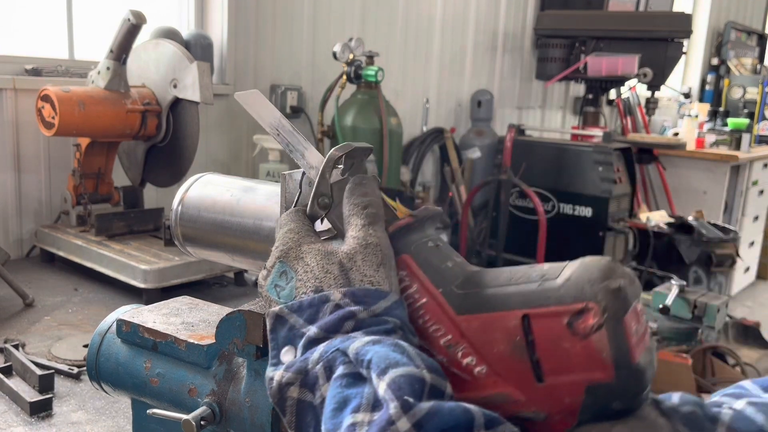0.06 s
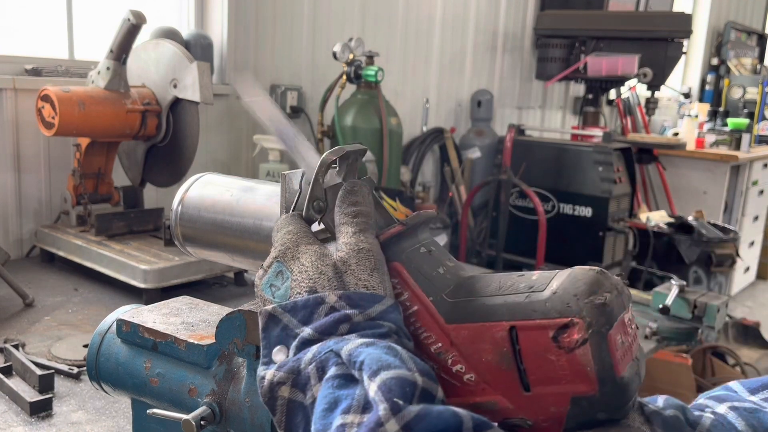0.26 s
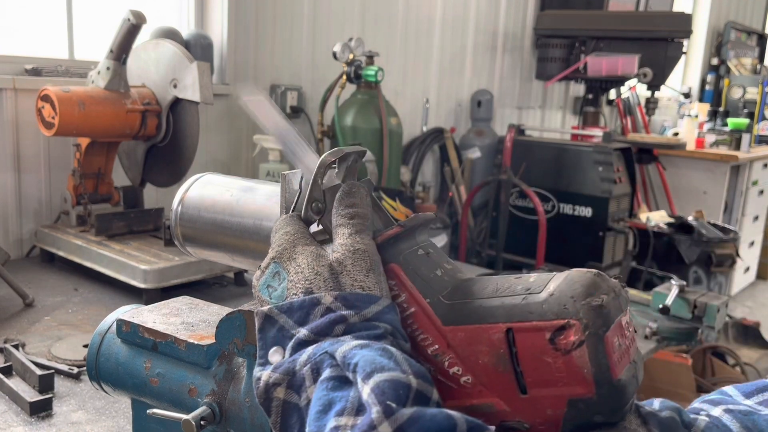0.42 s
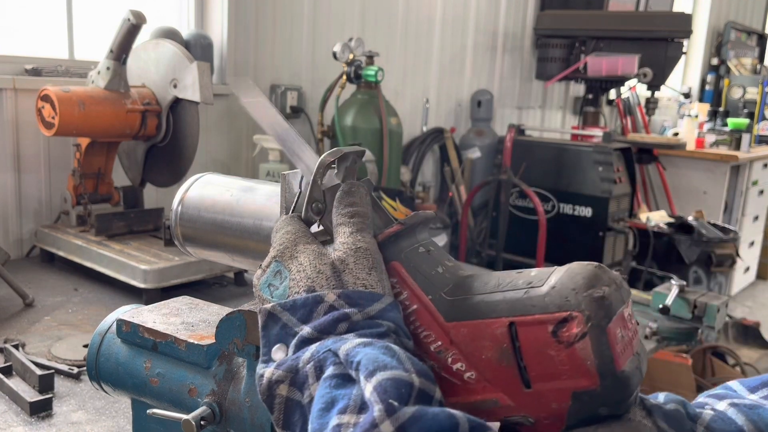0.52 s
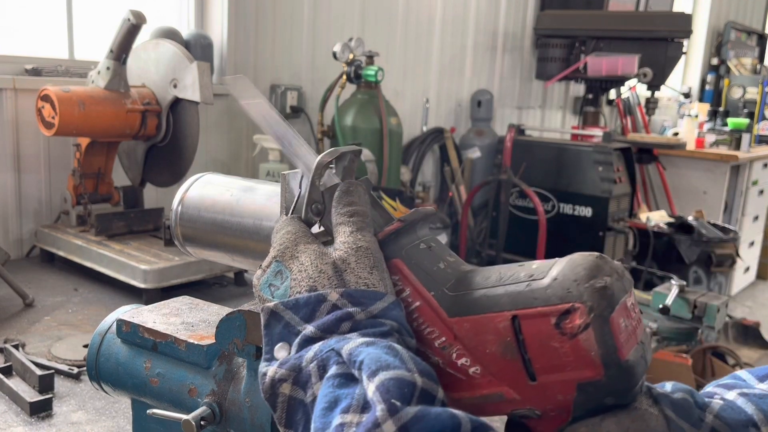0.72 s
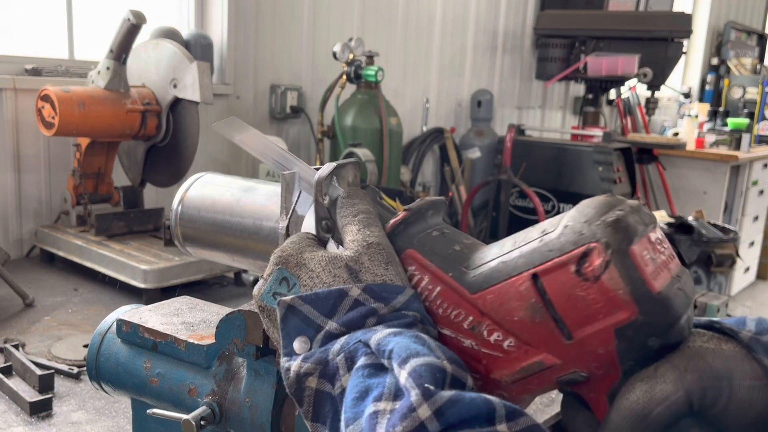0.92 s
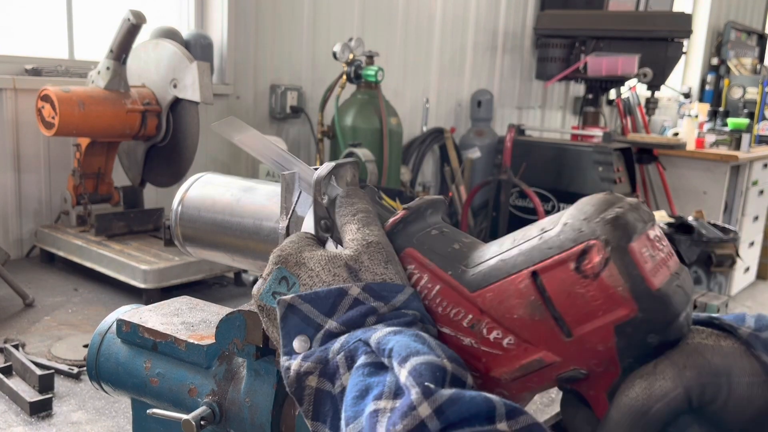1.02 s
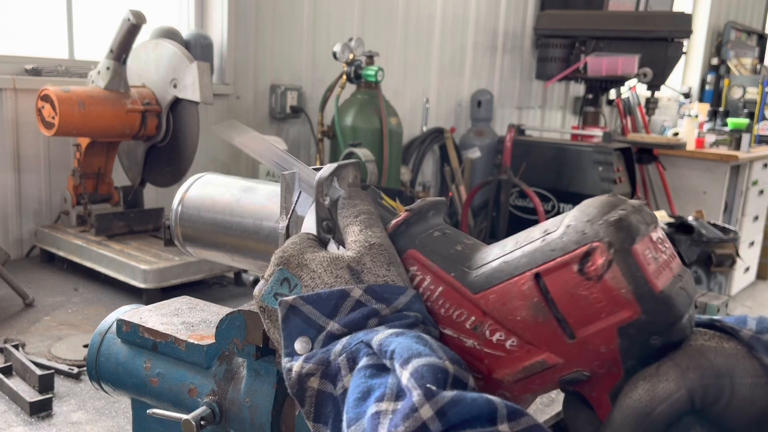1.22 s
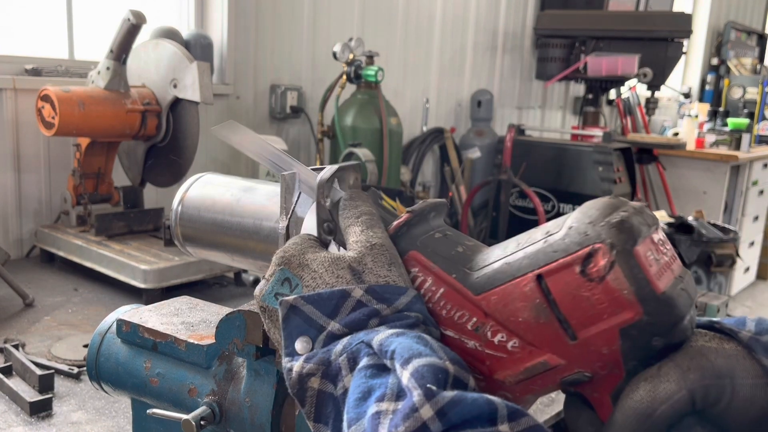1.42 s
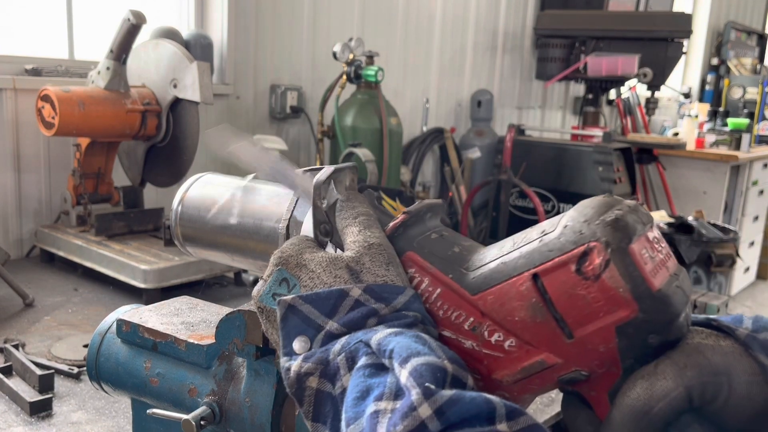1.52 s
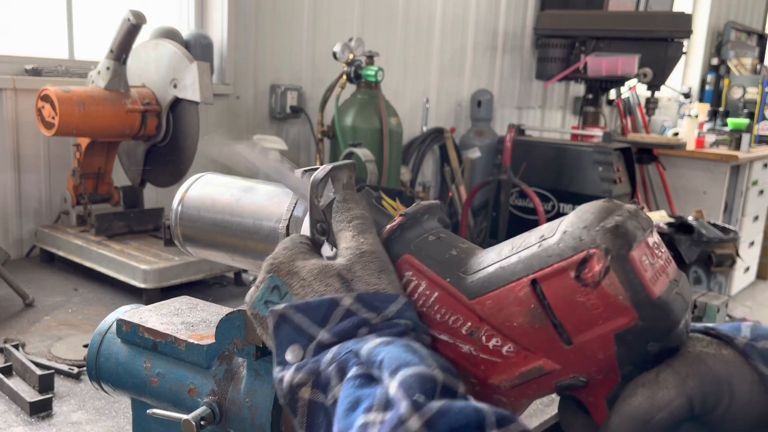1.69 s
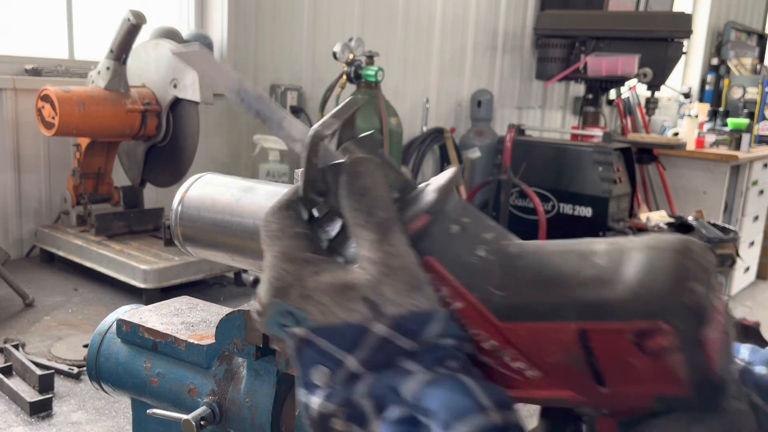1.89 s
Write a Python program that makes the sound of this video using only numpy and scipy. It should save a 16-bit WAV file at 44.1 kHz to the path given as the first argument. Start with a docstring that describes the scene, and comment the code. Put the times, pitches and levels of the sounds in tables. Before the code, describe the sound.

A reciprocating saw cuts metal close by in a small workshop. After near quiet, the trigger clicks at 0.13 seconds; slow knocking strokes accelerate into a rapid rasping buzz, with hard clacks and a piercing screech around 0.5-0.6. The level dips briefly at 0.95, then a lighter, steadier full-speed cut follows with sliding metallic resonances, fading from about 1.7 to 1.9, leaving a faint thin tone.

```python
"""A cordless reciprocating saw cuts a metal plate held in a vise, close by in a small workshop.
The trigger clicks and the saw runs up to about 47 strokes a second; the level dips briefly,
and a second, lighter cut is heard at full speed and fades away.
On each stroke, clusters of tiny impacts make the teeth rasp, the drive knock and the blade tick.
The rasp rings the plate, which also screeches; hard clacks sound where the blade snags.
Sliding resonances color the second cut, and a thin tone grows throughout, over faint background noise."""
import sys
import numpy as np
from scipy import signal
from scipy.fft import rfft, irfft
from scipy.io import wavfile
from scipy.ndimage import uniform_filter1d

SR = 44100
rng = np.random.default_rng(int(sys.argv[2]) if len(sys.argv) > 2 else 0)


def wav_record(signal):
    """Record a signal, one row per channel, as 16-bit PCM in the file named by sys.argv[1]."""
    frames = np.transpose(np.atleast_2d(signal))
    bounded = np.clip(frames, -1, 1)
    # unit amplitude maps onto the largest positive 16-bit level
    quanta = np.round(bounded * 32767).astype(np.int16)
    wavfile.write(sys.argv[1], SR, quanta)


N = 85995
T = np.arange(N) / SR  # time of every sample, seconds


def amp(db):
    """Turns decibels into a gain."""
    return 10 ** (np.asarray(db) / 20)


def evened(x):
    """Scales a signal to an rms (average strength) of 1."""
    return x / np.sqrt(np.mean(x ** 2) + 1e-20)


def curve(rows, axis=1):
    """Draws straight lines through one column of a time table, giving a value for every sample."""
    rows = np.array(rows)
    return np.interp(T, rows[:, 0], rows[:, axis])


def read(points, hz):
    """Reads a frequency table, with pitch spaced as the ear hears it (logarithmically)."""
    f, value = np.transpose(points)
    return np.interp(np.log(hz + 1), np.log(f + 1), value)


def pan(db):
    """Left and right gains that differ by db, with a mean power of 1."""
    return evened(amp([[db / 2], [-db / 2]]))


def colour(x, points, size=4096):
    """Gives a sound the spectrum in a table, using a filter of unit energy that never sounds early."""
    log_gain = np.log(amp(read(points, abs(np.fft.fftfreq(size, 1 / SR)))))
    minimum_phase = np.exp(np.conj(signal.hilbert(log_gain)))
    taps = np.fft.ifft(minimum_phase).real[:size // 2]
    return signal.fftconvolve(x, taps / np.linalg.norm(taps))[:N]


def ring(x, hz, width_hz):
    """A resonance of unit energy at a fixed or moving pitch; the narrower it is, the longer it rings."""
    turn = np.exp(2j * np.pi * np.cumsum(hz * np.ones(N)) / SR)
    r = np.exp(-np.pi * width_hz / SR)
    # Shift the pitch down to zero, smooth, then shift it back up.
    smoothed = signal.lfilter([np.sqrt(2 * (1 - r * r))], [1, -r], x / turn + 1e-18)
    return (turn * smoothed).real


# Spectrum of the background noise: (frequency [Hz], level [dB])
AIR = [(30, -1), (15000, -34)]
AIR_DB = -64


def background():
    """Faint noise, strongest in the bass and independent in the two channels."""
    return amp(AIR_DB) * np.array([colour(noise, AIR) for noise in rng.standard_normal((2, N))])


# Spectrum of the scraping teeth, also used for the trigger snap: (frequency [Hz], level [dB])
RASP = [(200, -19), (700, -2), (2600, 0), (3350, -6.5), (4100, 1.5), (5100, 0), (5500, -6), (7300, -6.5),
        (15000, -24.5)]
TRIGGER_S, SNAP_DB, SNAP_S = .131, -39, 0.0031  # start [s], level [dB], fading time [s]
TRIGGER_HZ, TRIGGER_DB, TRIGGER_T60 = 415, -39, 0.14  # housing tone; T60 is seconds to fade by 60 dB


def trigger():
    """The switch snaps as a burst of noise, and the housing rings briefly as a fading tone."""
    t = np.maximum(T - TRIGGER_S, 0)
    snap = amp(SNAP_DB) * (t > 0) * np.exp(-t / SNAP_S) * rng.standard_normal(N)
    housing = amp(TRIGGER_DB - 60 * t / TRIGGER_T60) * np.sin(2 * np.pi * TRIGGER_HZ * t)
    return colour(snap, RASP) + housing


def strokes(speed, bite_s):
    """Counts strokes from the moment the teeth catch by adding up the stroke rate."""
    turns = np.cumsum(curve(speed)) / SR
    return turns - np.interp(bite_s, T, turns)


TEETH_PER_S = 12000  # average number of tiny impacts per second
TOOTH_SPREAD_DB, BLOW_SPREAD_DB = 2.5, 1.34  # random variation in impacts and in whole blows


def blows(turns, rows, decay_s, floor, axis, rebound=1):
    """Clusters of tiny impacts start at set places in each stroke and die away, over steady rubbing."""
    kicks = np.zeros(N)
    for k, row in enumerate(rows):
        at = np.flatnonzero(np.diff(np.floor(turns - row[0])) > 0)
        # Rebound changes every blow except the first, the bite.
        strength = np.ones(N) * (rebound if k else 1)
        spread_db = BLOW_SPREAD_DB * rng.standard_normal(size=128)[:len(at)]
        kicks[at] += strength[at] * amp(row[axis] + spread_db)
    fading = signal.lfilter([1], [1, -np.exp(-1 / (decay_s * SR))], kicks)
    pressure = floor * rebound + fading
    sizes = amp(TOOTH_SPREAD_DB * np.minimum(rng.exponential(1, N), 4))
    sizes *= rng.choice([-1, 1], N)
    hits = rng.random(N) < TEETH_PER_S / SR
    return evened(pressure * sizes * hits)


# Spectrum of the saw's housing: (frequency [Hz], level [dB])
HOUSING = [(50, -64), (180, -19.5), (340, -7), (480, 1.5), (570, -5), (700, -18), (1100, -10.5),
           (8000, -55)]
KNOCK_S, KNOCK_FLOOR = 0.0026, 0.37  # fading time [s], rubbing between blows


def knocking(knock, turns, pattern, pace):
    """The drive strikes inside its housing, with stronger rebounds at higher speed."""
    hits = blows(turns, pattern, KNOCK_S, KNOCK_FLOOR, axis=1, rebound=pace)
    return colour(knock * hits, HOUSING)


# Spectrum of the blade's tick: (frequency [Hz], level [dB])
TICK = [(500, -37), (4000, -12), (7500, 1), (9500, -0.5), (10900, 3), (12000, -4.5)]
TICK_S, TICK_FLOOR = 0.0044, 0.25  # fading time [s], rubbing between blows


def ticking(tick, turns, pattern):
    """The blade makes short, bright ticks as it turns round."""
    return colour(tick * blows(turns, pattern, TICK_S, TICK_FLOOR, axis=3), TICK)


# Tones of the shaking saw body, before the knock force and speed scale them:
# (multiple of the stroke rate [-], first-cut level [dB], second-cut level [dB])
HUM = [(2, -24.5, -22), (3, -27.5, -14), (4, -14, -31), (6, -14.5, -17.5), (7, -12.5, -9.5),
       (12, -20, -10.5)]
# Spectrum of its low rumble: (frequency [Hz], level [dB])
RUMBLE = [(25, -13), (220, 1), (500, -25.5)]
RUMBLE_DB, SHAKE_POWER = -14.5, 3.23  # level before force and speed; how steeply shaking grows with speed


def shaking(knock, turns, pace, axis):
    """The saw body hums at multiples of the stroke rate and rumbles, more strongly at higher speed."""
    hum = np.zeros(N)
    for row in HUM:
        phase = 2 * np.pi * (round(row[0]) * turns + rng.random())
        hum += np.sqrt(2) * amp(row[axis]) * np.sin(phase)
    rumble = amp(RUMBLE_DB) * colour(rng.standard_normal(N), RUMBLE)
    return knock * pace ** SHAKE_POWER * (hum + rumble)


# Natural tones of plate and blade:
# (frequency [Hz], time to fade by 60 dB [s], first-cut level [dB], second-cut level [dB])
PLATE = [(1001.5, 0.64, -20, -14.5), (1083, 0.077, -10.5, -12), (2474, 0.075, -11, -49),
         (2675, 0.025, -15.5, -22), (2835, 0.02, -13, -31), (3886, 0.029, -11, -32),
         (4810, 0.041, -11.5, -41), (5020, 0.047, -23, -17), (7202, 0.033, -16, -5.5)]


def ringing(drive, axis):
    """Impacts set off the natural tones of plate and blade, with the strengths of one cut."""
    tones = np.zeros(N)
    for row in PLATE:
        width_hz = np.log(1000) / np.pi / row[1]
        tones += amp(row[axis + 1]) * ring(drive, row[0], width_hz)
    return tones


RASP_S = 0.0093  # fading time of each rasp [s]
FULL_RATE = 43.9  # strokes per second at which pace is 1


def cut(speed, bite_s, force, pattern, rubbing, axis):
    """One cut adds rasping teeth, knocking, ticking, shaking and the ringing plate."""
    turns, pace = strokes(speed, bite_s), curve(speed) / FULL_RATE
    knock, rasp, tick = (amp(curve(force, axis=k)) for k in (1, 2, 3))
    teeth = rasp * blows(turns, pattern, RASP_S, rubbing, axis=2, rebound=pace)
    saw = colour(teeth, RASP)
    saw += knocking(knock, turns, pattern, pace)
    saw += ticking(tick, turns, pattern)
    saw += shaking(knock, turns, pace, axis)
    return saw + ringing(teeth, axis)


# Stroke rate of the first cut: (time [s], rate [strokes/s])
SPEED_A = [(.179, 24.8), (.28, 24.8), (.4, 31.3), (.5, 41.1), (.6, 43.3), (.7, 45.4), (.8, 46.5), (.92, 47)]
# Its changing force: (time [s], knock level [dB], rasp level [dB], tick level [dB])
FORCE_A = [(.135, -46, -46.5, -59), (0.216, -32, -25.5, -34), (.33, -25, -26.5, -31),
           (.42, -22.5, -25.5, -26), (.48, -27, -24, -27), (.75, -24.5, -22.5, -26.5),
           (0.917, -26.5, -22, -27), (.945, -53, -70, -48)]
# Its blows in each stroke, before evening out:
# (share of the cycle [-], knock level [dB], rasp level [dB], tick level [dB])
BLOWS_A = [(.0, -4, -8.5, -26), (0.271, -5.5, -3.5, 3), (0.758, -9.5, -8, -5)]
BITE_A_S, RUB_A = .179, .05  # a moment when the teeth catch [s]; rubbing between rasps


def first_cut():
    """The saw speeds up as its teeth repeatedly strike the plate."""
    return cut(SPEED_A, BITE_A_S, FORCE_A, BLOWS_A, RUB_A, axis=1)


# Screech strength before flaring and panning: (time [s], level [dB])
SCREECH = [(.14, -54), (.23, -33.5), (.45, -28), (.495, -17), (.57, -12.5), (.605, -25), (.635, -23),
           (.68, -27), (.91, -26), (.945, -62), (1.42, -30), (1.72, -36.5), (1.95, -70)]
SCREECH_HZ, SCREECH_WIDTH_HZ, SCREECH_PAN_DB = 4298, 7, 10.5  # pitch, blur, left above right
SCREECH_FADE_CYCLES, SCREECH_HOLD = 0.8, .2  # fading within a stroke; steady part added to each flare


def screech(turns):
    """The plate chatters at one slightly unsteady pitch, flaring up as each stroke bites."""
    drift = np.cumsum(rng.standard_normal(N)) * np.sqrt(2 * np.pi * SCREECH_WIDTH_HZ / SR)
    flare = np.exp(-(turns % 1) / SCREECH_FADE_CYCLES)
    pump = SCREECH_HOLD + uniform_filter1d(flare, size=90)  # soften each sudden rise
    tone = np.sqrt(2) * np.sin(2 * np.pi * SCREECH_HZ * T + drift)
    return pan(SCREECH_PAN_DB) * amp(curve(SCREECH)) * pump * tone


# Snags of the blade, before filtering: (time [s], chatter level [dB], thump level [dB])
CLACKS = [(.178, -27, -19), (0.218, -14.5, -6.5), (0.256, -16.5, -0.5), (.299, -16, 3.5),
          (.336, -15.5, 3.5), (.373, -26, 4.5), (0.434, -11.5, -9), (0.464, -7, -0.5), (.488, -3.5, -12),
          (0.542, -4, 1), (.627, -7, -2), (.912, -10.5, -8)]
CLACK_S, CLACK_LOW_HZ, RECOIL_S = 0.0044, 2080, 0.003993  # fading time, lower edge, delay of the thump


def clacks():
    """The blade snags: hard chatter rings the plate's upper tones, and recoil thumps the housing."""
    chatter, thumps = np.zeros(N), np.zeros(N)
    for s, chatter_db, thump_db in CLACKS:
        chatter += (T >= s) * amp(chatter_db) * np.exp(-abs(T - s) / CLACK_S)
        thumps[round((s + RECOIL_S) * SR)] = amp(thump_db)
    highpass = signal.butter(2, CLACK_LOW_HZ, "high", fs=SR, output="sos")
    hard = signal.sosfilt(highpass, chatter * rng.choice([-1, 1], N))
    return ringing(hard, axis=1) + colour(thumps, HOUSING)


def lingering(hz=2645, db=-48):
    """A tone of the metal grows steadily from the first bite to the end, as the saw fades away."""
    growth = np.maximum(T - BITE_A_S, 0) / T[-1]
    return amp(db) * growth * np.sin(2 * np.pi * hz * T)


# Stroke rate of the second cut: (time [s], rate [strokes/s])
SPEED_B = [(1.4, 46.7), (1.5, 46.9), (1.6, 47.6), (1.68, 49), (1.8, 47.3)]
# Its changing force: (time [s], knock level [dB], rasp level [dB], tick level [dB])
FORCE_B = [(0.947, -40, -31.5, -34), (.985, -34.5, -25.5, -31), (1.55, -32, -24, -31),
           (1.75, -32, -28.5, -33), (1.815, -41, -37.5, -40.5), (1.85, -53, -53.5, -89.5),
           (1.95, -65, -54, -83)]
# Its blows in each stroke, before evening out:
# (share of the cycle [-], knock level [dB], rasp level [dB], tick level [dB])
BLOWS_B = [(.0, -12, 8, -5.5), (.39, 6, -4, -6), (0.723, -1, -25, -15)]
BITE_B_S, RUB_B = 0.99, .45  # a moment when the teeth catch [s]; rubbing between rasps


def second_cut():
    """A separate, lighter cut is heard at full speed, with more rubbing between rasps, and fades away."""
    return cut(SPEED_B, BITE_B_S, FORCE_B, BLOWS_B, RUB_B, axis=2)


# A blade resonance that rises a little, then sinks: (time [s], frequency [Hz], drive level [dB])
SINKING = [(.98, 2180, -31), (1.09, 2260, -29.5), (1.34, 1870, -36)]
# A narrow ring of the plate that sinks, then rises a little: (time [s], frequency [Hz], drive level [dB])
SQUEAL = [(1.22, 3985, -39.5), (1.46, 3865, -28), (1.54, 3906, -33.5)]
SINKING_WIDTH_HZ, SQUEAL_WIDTH_HZ = 100, 20


def sliding_resonance(track, width_hz):
    """The teeth of the second cut set off a resonance whose pitch slides as the cut deepens."""
    teeth = blows(strokes(SPEED_B, BITE_B_S), BLOWS_B, RASP_S, RUB_B, axis=2)
    sounding = (T > track[0][0]) & (T < track[-1][0])
    return ring(teeth * sounding * amp(curve(track, axis=2)), curve(track), width_hz)


# Level difference between the microphones: (frequency [Hz], left minus right level [dB])
TILT = [(700, 0.5), (1200, 2.5), (2400, -2), (4400, 6.5), (7500, 0)]
# Phase difference between the microphones: (frequency [Hz], left lead [radians])
LEAD = [(200, 0), (1100, .6), (1550, -.8), (2900, 1.1), (6800, -1.4), (11000, -6), (13200, -6.6),
        (15000, -9)]


def ports(saw, plate):
    """The direct sound reaches two microphones with different levels and phases at each pitch."""
    hz = np.fft.rfftfreq(2 * N, 1 / SR)
    side = np.array([[.5], [-.5]])
    gains = amp(side * read(TILT, hz))
    gains = gains / np.sqrt((gains ** 2).mean(0))
    # The screech is already panned, so only its phases change here.
    z = rfft(saw, 2 * N) * gains + rfft(plate, 2 * N)
    return irfft(z * np.exp(1j * side * read(LEAD, hz)))[:, :N]


# How long the room's echoes last: (frequency [Hz], time to fade by 60 dB [s])
ROOM = [(300, 0.36), (3000, 0.5), (14000, 0.023)]
ROOM_DB, NEAR_DB = -12.5, -10  # echo levels before the bass is removed
NEAR_S, SCATTER_HZ = .006, 440  # fading time of the nearby scatter; lower edge of all echoes


def workshop(x, size=256):
    """Quick scatter from nearby metal widens all but the bass; then comes the room's short tail."""
    t = T[:SR // 2]
    near, far = rng.standard_normal(len(t)), rng.standard_normal((2, len(t)))
    near = np.array([[1], [-1]]) * near * np.exp(-t / NEAR_S)  # opposite signs left and right
    hz, at, z = signal.stft(far * (t > 2 * NEAR_S), SR, nperseg=size)
    fading = amp(-60 * at / read(ROOM, hz)[:, None])
    far = signal.istft(z * fading, SR, nperseg=size)[1][:, :len(t)]
    taps = np.zeros((2, len(t)))
    for db, echoes in [(NEAR_DB, near), (ROOM_DB, far)]:
        taps += amp(db) * echoes / np.linalg.norm(echoes, axis=1, keepdims=True)
    taps = signal.sosfilt(signal.butter(2, SCATTER_HZ, "high", fs=SR, output="sos"), taps)
    return x + signal.fftconvolve(x, taps, axes=1)[:, :N]


def scene():
    """Two separate cuts are heard in the quiet workshop."""
    second = T > FORCE_B[0][0]
    first = (T > TRIGGER_S) & ~second
    saw = first * first_cut() + second * second_cut()
    saw += sliding_resonance(SINKING, SINKING_WIDTH_HZ) + sliding_resonance(SQUEAL, SQUEAL_WIDTH_HZ)
    saw += trigger() + clacks() + lingering()
    turns = np.where(second, strokes(SPEED_B, BITE_B_S), strokes(SPEED_A, BITE_A_S))
    air = background()
    plate = (first | second) * screech(turns)
    return workshop(ports(saw, plate)) + air


# Frequency response of the microphones, with a deep notch: (frequency [Hz], level [dB])
MIC = [(7400, -1.5), (7900, -18), (8600, -31.5), (9200, -7), (9800, -1), (13900, 2), (14800, -16)]
EDGE_HZ = 15800  # upper limit of the sound


def record(dry, dip_s=0.951, dip_width_s=0.012, dip_db=-8):
    """The level dips briefly where the two cuts join; the microphones then shape and limit the treble."""
    dipped = dry * amp(dip_db * np.exp(-((T - dip_s) / dip_width_s) ** 2))
    response = amp(read(MIC, np.fft.rfftfreq(2 * N, 1 / SR)))
    heard = irfft(rfft(dipped, 2 * N) * response)[:, :N]
    lowpass = signal.firwin(511, EDGE_HZ, window=("kaiser", 9), fs=SR)
    return signal.oaconvolve(heard, lowpass[None], "same")


dry = scene()
out = record(dry)
wav_record(out)
```